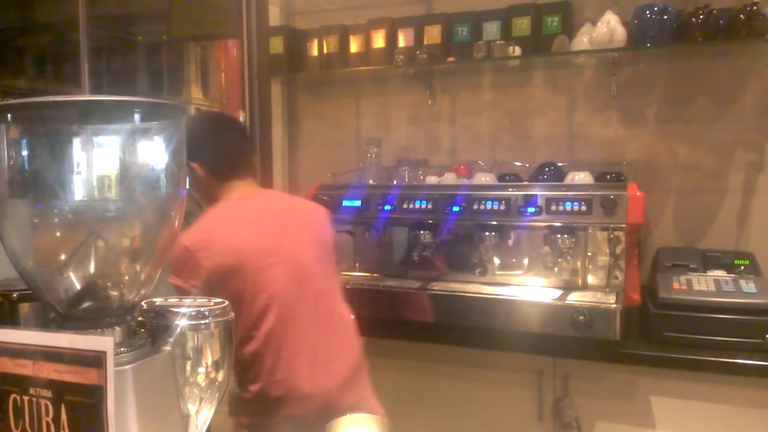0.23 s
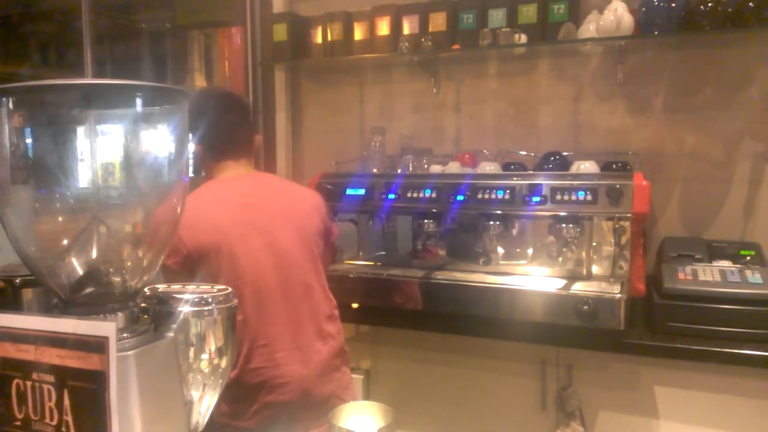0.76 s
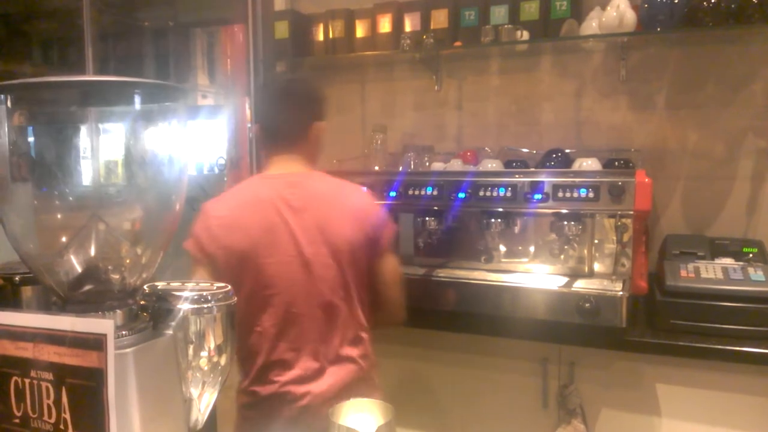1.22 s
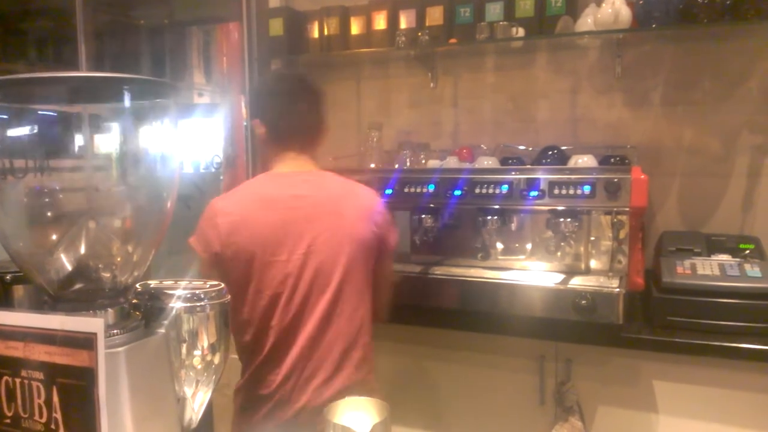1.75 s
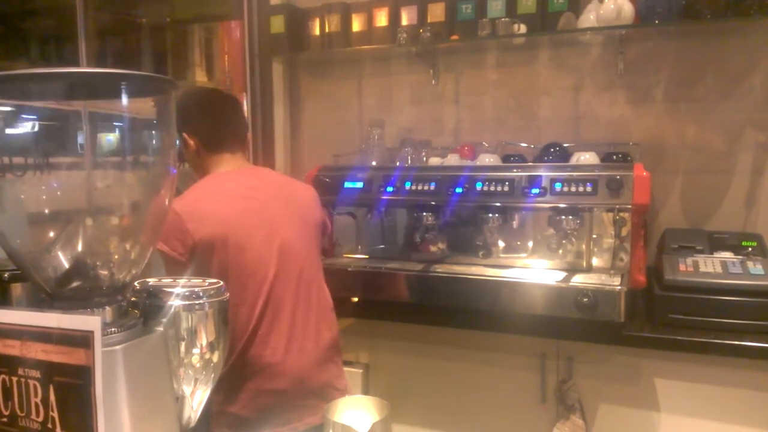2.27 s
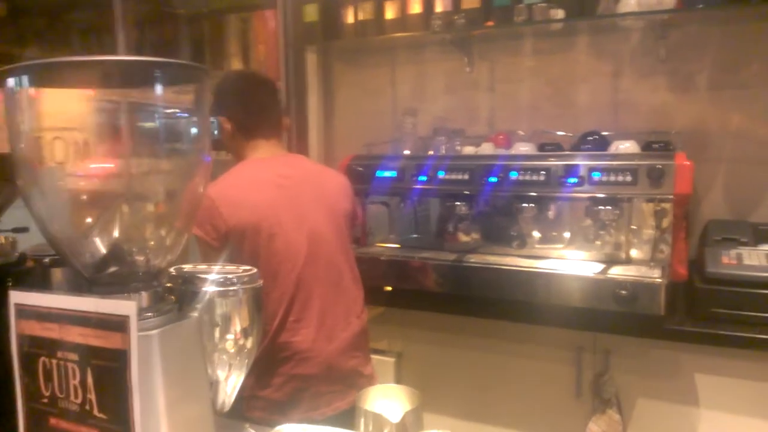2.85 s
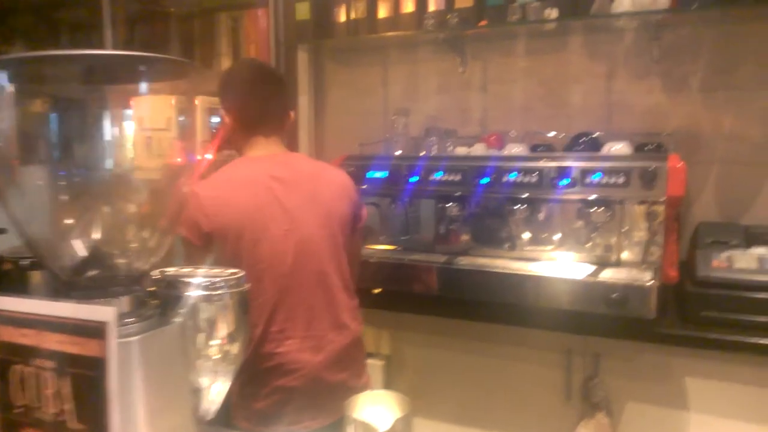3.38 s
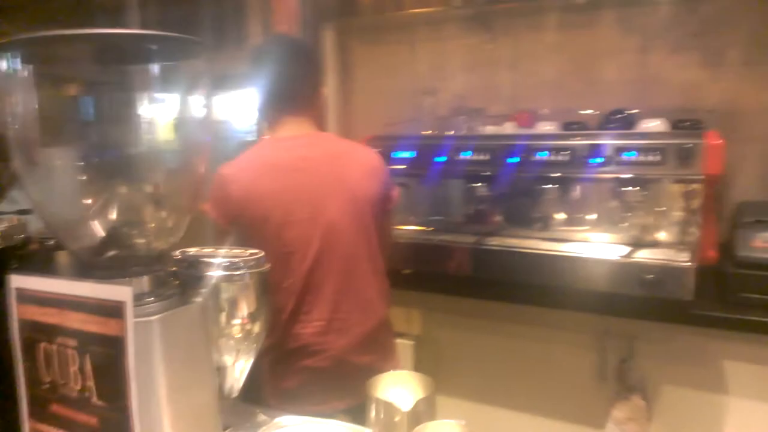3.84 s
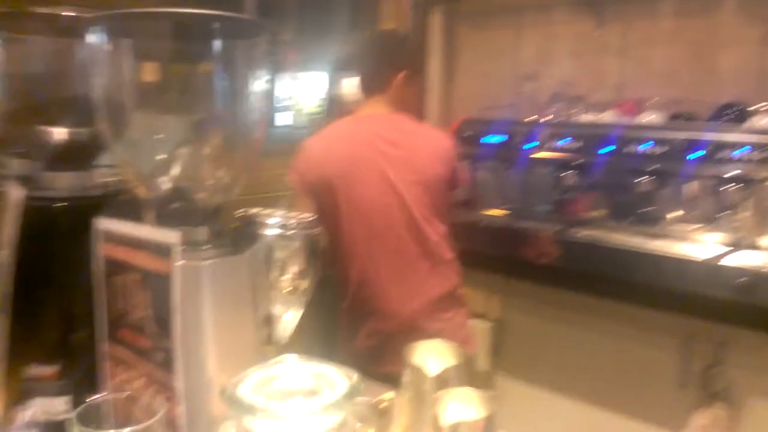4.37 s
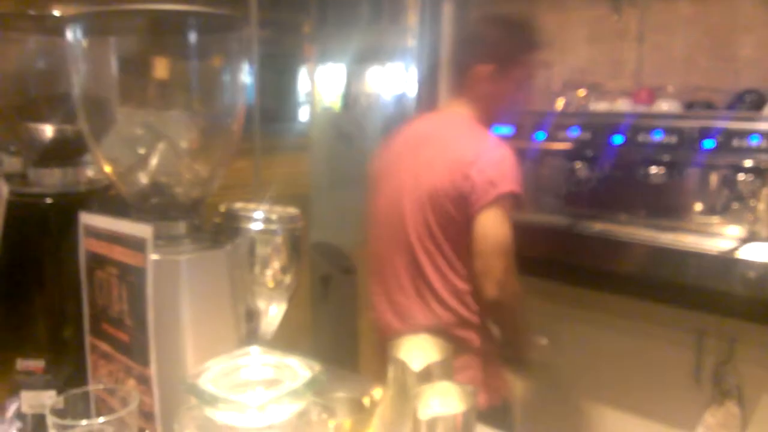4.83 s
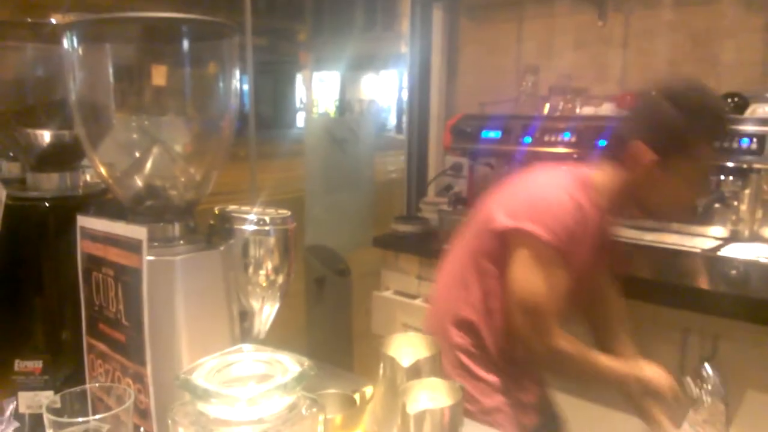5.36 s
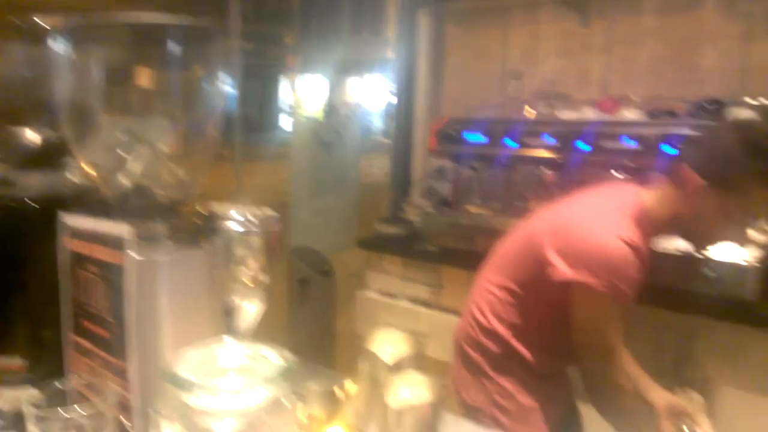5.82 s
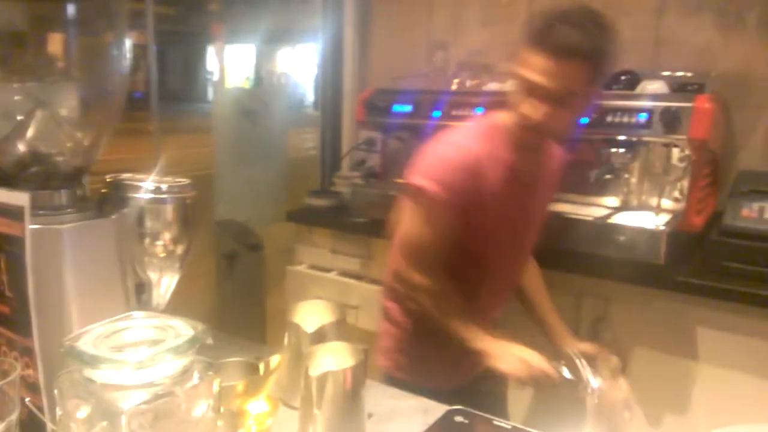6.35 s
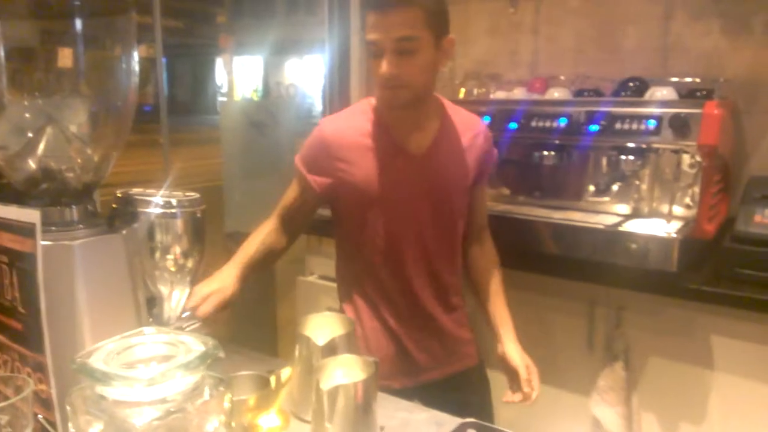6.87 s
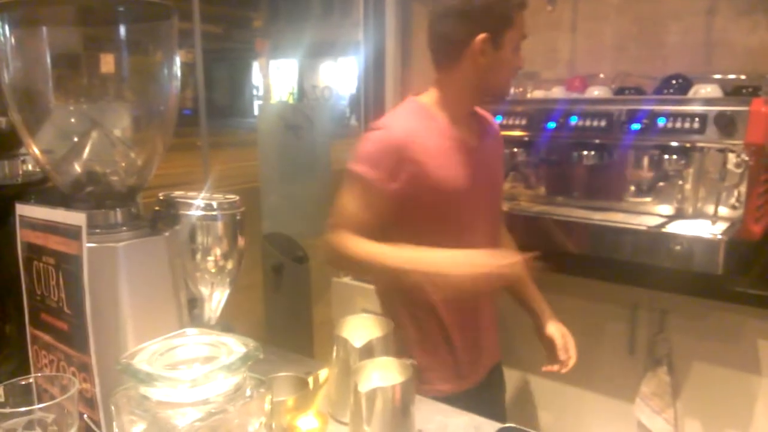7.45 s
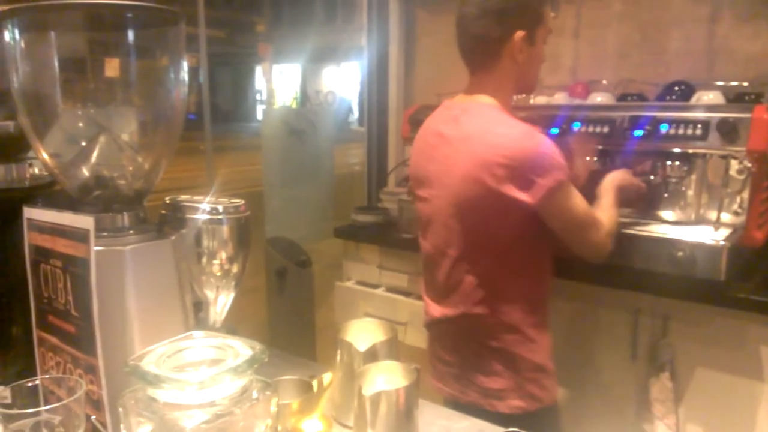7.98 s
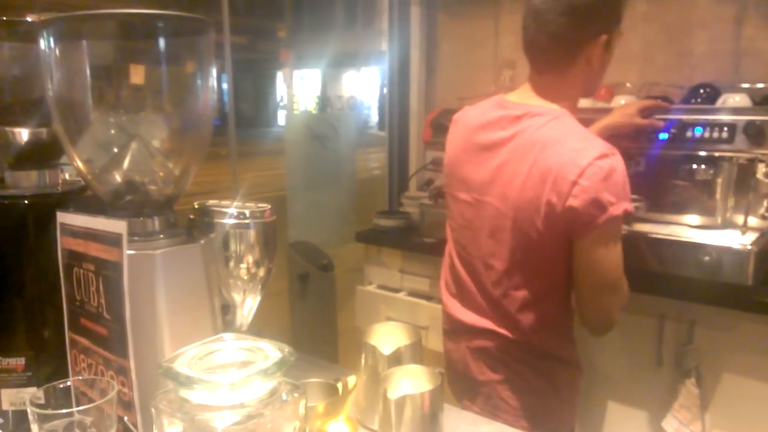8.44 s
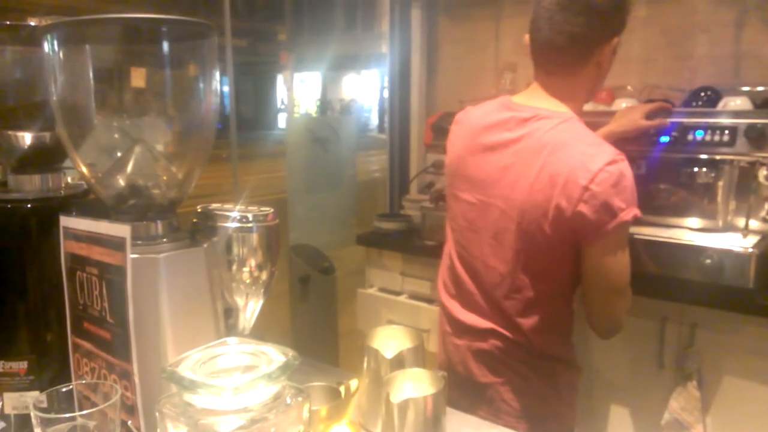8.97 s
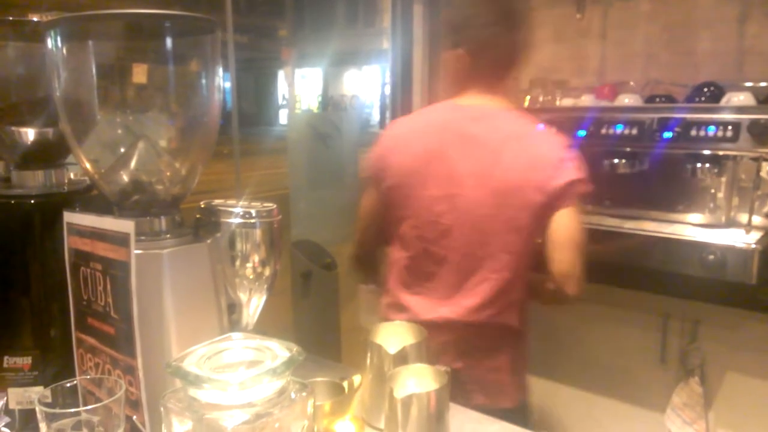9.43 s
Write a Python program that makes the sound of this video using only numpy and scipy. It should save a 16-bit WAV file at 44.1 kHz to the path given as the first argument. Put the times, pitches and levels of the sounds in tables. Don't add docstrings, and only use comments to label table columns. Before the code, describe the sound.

Echoing coffee bar heard through a small microphone a few metres off: three sharp metal bangs, a faint distant pump and rustling, then five harder bangs, the last ringing on. Near ticks and a single sharp steel tap come next. After soft cloth movement a lid clunks down, then comes a short gritty twist, valve clack, faint spray with humming pump and thin whistle, and a closing clack. Fridge hum and airy rumble continue.

```python
import sys
import numpy as np
from scipy import signal
from scipy.fft import rfft, irfft, next_fast_len
from scipy.io import wavfile
from scipy.ndimage import uniform_filter1d

SR = 44100
rng = np.random.default_rng(int(sys.argv[2]) if len(sys.argv) > 2 else 0)


def transcribe(u):
    v = np.clip(np.atleast_2d(u).T, -1, 1)
    q = np.round(v * 32767).astype(np.int16)
    wavfile.write(sys.argv[1], SR, q)


def ratio_of_db(decibels):
    return 10 ** (np.asarray(decibels, float) / 20)


N = 427769
HALL_SPAN = 2 ** 16

# t/s, peak level/dB, thump level re peak/dB, brightness/(dB/octave), favoured f of the spot struck/Hz
FIRST_KNOCKS = [
    (0.250, -2.5, -17.5, -1.5, 5300),
    (0.418, -5, -16.5, -1, 2050),
    (0.582, -5, -14.5, -0.5, 2050),
]
SECOND_KNOCKS = [
    (2.177, -2, -14, -1.3, 4400),
    (2.346, -7.5, -9.5, -0.86, 5300),
    (2.513, -1, -15, -0.088, 4370),
    (2.702, -3, -10.5, -0.15, 1900),
    (2.907, -5.5, -8, 0.81, 4550),
]
RIM_TAP = [
    (4.277, -6.5, -18.5, 0.02, 5250),
]
LID_BOUNCES = [
    (7.070, -27, -0.5, -7.5, 350),
    (7.075, -27.5, -19, 3, 5200),
    (7.089, -41, -10.5, 4, 5100),
    (7.106, -30.5, -0.5, -14, 340),
    (7.147, -35, 2.1, 2.1, 5200),
    (7.130, -30, 1.1, 3, 5100),
    (7.184, -26, -32, 1.5, 1060),
    (7.211, -31.5, -25, -2.5, 1050),
]
VALVE_OPENS = [
    (8.267, -35, -30, 0.1, 2200),
    (8.282, -19, -18, 0.1, 6160),
    (8.294, -29, -30, 0.1, 1650),
]
VALVE_SHUTS = [
    (8.945, -27, -22, 0.1, 2420),
]
# f/Hz, level/(dB/Hz)
KNOCK_COLOUR = [(70, -33), (360, -13.5), (540, -19), (800, -16), (1400, -12), (1600, -3.5), (2050, -2),
                (2700, -5), (3500, -13), (4300, -4), (5400, -6), (8000, -24), (9100, -23), (16000, -39)]
TAP_COLOUR = [(150, -48), (300, -18), (500, -16), (800, -9.5), (1200, -15.5), (1600, -3.5), (2100, -0.5),
              (2800, -2), (3400, -16), (4300, -5), (5300, -5.5), (8000, -22), (9200, -22), (16000, -43)]
LID_COLOUR = [(88, -24), (150, -6.5), (222, -1), (280, -9.5), (354, -6), (759, -15.5), (1040, -14.5),
              (1420, -15.5), (2360, -17.5), (2810, -28.5), (5150, -25.5), (7320, -41), (16000, -68)]
OPENING_COLOUR = [(240, -44), (400, -25.5), (753, -17), (826, -18), (1070, -20), (1580, -10), (2020, -12.5),
                  (2320, -14), (3470, -18), (5780, -4.5), (6540, -23.5), (9470, -12.5), (16000, -34)]
SHUTTING_COLOUR = [(300, -38), (600, -23), (1000, -15), (1600, -6.5), (2400, -6.5), (3300, -3),
                   (5700, -8.5), (8270, -22.5), (9200, -19), (16000, -35)]
# f/Hz, level/dB, t60/s
HANDLE_MODES = [(2046, -1, .2), (2390, -8, .25), (2560, -8, .15), (4195, -7, .85), (4214, -7.5, .8),
                (5500, -1, .05), (6500, -11, .1), (7450, -16, .12), (8900, -15, .1), (9300, -15, .15),
                (14000, -30, .1)]
BASKET_MODES = [(1810, 2, 0.18), (2120, -10, 0.14), (2480, 4, 0.15), (4220, -2.5, .9), (4280, -15, .5),
                (4320, -4, .35), (4600, -6, 0.98), (5300, -8, .06), (6070, -5, .15), (6600, -9, .15),
                (7250, -12, .18), (9100, -15, .15), (10900, -23, .13), (14000, -26, .12)]
RIM_MODES = [(1852, -6, .08), (2358, -5, .08), (2632, -4, .08), (4300, 0, .08), (4660, -2, .12),
             (5100, -2, .12), (6761, -13, .3), (7330, -14, .12), (9157, -22, .4)]
LID_MODES = [(361, -3, 0.094), (990, -18, .08), (1900, -3, 0.082), (2400, -14, .09), (4700, -18, .07),
             (8450, -26, 0.23)]
ARMATURE_MODES = [(1610, -10, .15), (4780, -10, .15), (5114, -9, .2), (5705, 0, .35), (5780, -5, .3),
                  (5870, -4, .4), (8802, -12, .15), (9400, -13, .2), (9700, -14, .15)]
PLUNGER_MODES = [(759, -16, .45), (2277, -2, .06), (2700, 0, .05), (4527, -5, .1), (5717, -6, .1),
                 (9300, -13, .12), (9370, -15, .2)]
# f/Hz, t60/s
HALL_T60 = [(100, 0.55), (300, 0.67), (700, 0.85), (1800, 0.94), (4800, 1), (8000, .65), (13000, 0.46)]
# level/dB, rise/s, hold/s, fall/(dB/s)
TWIST_SWELL = (-49.5, 0.04, .08, 140)
# f/Hz, width/Hz, level/dB
SEAT_MODES = [(827, 60, 10), (1500, 330, 8.5), (2200, 450, 11), (4550, 360, 13), (5300, 450, -25),
              (7200, 2000, -21.5), (9000, 300, -29)]
# level/dB, rise/s, hold/s, fall/(dB/s)
PUMP_SWELL = (-60.5, 0.4, 0.5, 502)
WHISTLE_SWELL = (-61, .3, .12, 800)
FAR_PUMP_SWELL = (-58, .06, .15, 300)
# t/s, peak level/dB, length/s, f/Hz
TICKS = [(3.5132, -23, 0.00041, 6200), (3.516, -30.5, .002, 5600), (3.520, -38, .004, 5600),
         (3.525, -34, .0015, 5400), (3.519, -53.5, 0.025, 7400), (3.521, -64, .05, 8500),
         (3.737, -52, 0.026, 5200), (5.338, -49, .002, 5200), (7.897, -47, .003, 4800),
         (4.185, -48.5, 0.089, 1460)]
# t of top/s, level/dB, rise/s, hold/s
RUSTLES = [(1.15, -76, .2, 0.13), (1.39, -78, .1, .02), (1.684, -76, .1, .01), (1.83, -85, .05, .15),
           (4.08, -92, .03, .01), (4.798, -70, .15, .01), (4.93, -67.5, 0.11, 0.016),
           (5.332, -69, .07, .02), (5.93, -84, .3, .05), (6.188, -72.5, .1, .01),
           (6.368, -74, 0.066, 0.066), (6.55, -81.5, .15, 0.073), (6.694, -74, .04, .005),
           (6.95, -86, .04, .005), (7.42, -85, .05, .06), (7.68, -77, .03, .1), (7.9, -70.5, .2, 0.099),
           (8.2, -82, .1, .05), (9.3, -90, .1, .02), (9.6, -71.5, .08, .05)]
# f/Hz, level/(dB/Hz)
RUSTLE_COLOUR = [(2500, -13), (4500, 3.5), (6000, 3), (7500, -9.5), (10000, -19), (15500, -27)]
AIR_COLOUR = [(150, -19), (250, -1), (400, -3), (620, -4.5), (900, -4.5), (1200, -6.5), (1750, -3),
              (2440, -9), (3400, -16), (4500, -10.5), (5800, -15.5), (6800, -28.5), (8000, -60),
              (16000, -52)]
RUMBLE_COLOUR = [(8.8, -44), (15, 16.5), (54, 5), (70, -14), (97, -1.5), (123, -3), (204, -10), (244, -1),
                 (400, -43), (520, -45), (880, -120)]
# f/Hz, width/Hz, level/dB
HUM_TONES = [(96.8, 7.1, -61), (150, 17.5, -60), (177.2, 4.5, -61.5), (234.6, 16, -67.5), (909, 7, -67),
             (1685, 14, -69.5)]
# t/s, level/dB
BUSTLE = [(0, -45), (1.1, -43), (2.1, -43.5), (3.6, -48.5), (5.0, -48.5), (7.0, -55.5), (8.2, -48.5),
          (9.7, -54)]


def knocks():
    box = hall(direct_db=-9.5, direct_s=0.01, first_echo_s=0.0063, build_s=0.0014, early_db=2.5, early_s=0.034)
    first = blows(FIRST_KNOCKS, KNOCK_COLOUR, HANDLE_MODES, box, ring_db=-16, near_db=30.5, thump_hz=120,
                  thump_t60=.2, lift_db=4, lead_s=.006, grip_db_per_s=170, thump_rise_s=.018,
                  overtone=.6, overtone_ratio=1.4, slap_db=-10.5, thump_wet_db=-17)
    second = blows(SECOND_KNOCKS, KNOCK_COLOUR, BASKET_MODES, box, ring_db=-17, near_db=29, thump_hz=118,
                   thump_t60=.19, lift_db=4, lead_s=.006, grip_db_per_s=5, thump_climb=.11, thump_rise_s=.016,
                   overtone=.55, overtone_ratio=1.33, slap_db=-10.5, thump_wet_db=-13)
    return first + second


def rim_tap():
    ledge = hall(direct_db=-5, direct_s=.011, first_echo_s=0.0039, build_s=0.002, early_db=2.5, early_s=0.014)
    return blows(RIM_TAP, TAP_COLOUR, RIM_MODES, ledge, ring_db=-10, near_db=30.5, thump_hz=129,
                 thump_t60=.03, lift_db=3, lead_s=.005)


def lid_drop():
    bar = hall(direct_db=17, direct_s=0.0029, first_echo_s=0.0023, build_s=0.0028, early_db=5.5, early_s=0.026)
    return blows(LID_BOUNCES, LID_COLOUR, LID_MODES, bar, ring_db=-18, near_db=38.5, thump_hz=350,
                 thump_t60=.052, lift_db=4, grip_db_per_s=500)


def valves():
    group = hall(direct_db=7, direct_s=0.0029, first_echo_s=0.00082, build_s=0.0017, early_db=7, early_s=0.012)
    opening = blows(VALVE_OPENS, OPENING_COLOUR, ARMATURE_MODES, group, ring_db=-10, near_db=32,
                    thump_hz=280, thump_t60=.07, lift_db=6)
    shutting = blows(VALVE_SHUTS, SHUTTING_COLOUR, PLUNGER_MODES, group, ring_db=-10.5, near_db=35,
                     thump_hz=149, thump_t60=.071, lift_db=4)
    return opening + shutting


def twist():
    clicks_per_s = 1500
    size = ratio_of_db(3.0 * np.minimum(rng.exponential(1, N), 4))
    grit = (rng.random(N) < clicks_per_s / SR) * size * rng.choice([-1, 1], N)
    grit = grit + 1.6 * rng.standard_normal(N)
    seat = sum(ratio_of_db(db) * resonance(resonance(grit, hz, 3 * width), hz, width) for hz, width, db in SEAT_MODES)
    return swell(7.89, *TWIST_SWELL) * rms_one(seat)


def pumps():
    white = rng.standard_normal(N)
    pump_hz, whistle_hz, far_pump_hz = 480, 5100, 510
    pump = np.sqrt(2) * np.sin(2 * np.pi * pump_hz * np.arange(N) / SR) * ratio_of_db(2.5 * drift(11))
    whistle = resonance(white, whistle_hz, 30)
    far_pump = resonance(white, far_pump_hz, 4)
    out = swell(8.57, *PUMP_SWELL) * pump
    out += swell(8.8, *WHISTLE_SWELL) * whistle
    return out + swell(1.17, *FAR_PUMP_SWELL) * far_pump


def rustle_and_flush():
    fall_db_per_s, flush_s, flush_end_s, sag_db_per_s = 122, 8.4, 8.94, 26
    flush_db, spray_db, spray_hz = -61.5, -63, 7500
    gain = sum(swell(*move, fall_db_per_s) for move in RUSTLES)
    flow = swell(flush_s, 0, .15, 0, sag_db_per_s) * swell(0, 0, 1, flush_end_s, fall_db_per_s)
    hiss = ratio_of_db(16.0) * patchy_noise(RUSTLE_COLOUR, patchy_db=2.5, rate=14)
    spray = resonance(rng.standard_normal(N), spray_hz, 6000)
    return (gain + ratio_of_db(flush_db) * flow) * hiss + ratio_of_db(spray_db) * flow * spray


def ticks():
    out, t = np.zeros(N), np.arange(4096) / SR
    bursts = rng.standard_normal((len(TICKS), t.size))
    for (s, db, length_s, hz), burst in zip(TICKS, bursts):
        burst = resonance(resonance(burst, hz, .5 * hz), hz, .5 * hz)
        at = round(s * SR)
        out[at:at + t.size] += ratio_of_db(db) * burst * np.exp(-(t / length_s) ** 2)
    return out


def fridge_hum():
    white = rng.standard_normal(N)
    return sum(ratio_of_db(db) * resonance(white, hz, width) for hz, width, db in HUM_TONES)


def air_and_rumble():
    rumble_db, = in_time(BUSTLE)
    air_db = -51.5 + 0.43 * (rumble_db - rumble_db.mean())
    air = ratio_of_db(air_db) * patchy_noise(AIR_COLOUR, patchy_db=.4, rate=6)
    return air + ratio_of_db(rumble_db) * patchy_noise(RUMBLE_COLOUR, patchy_db=0.0, rate=7.4)


def blows(events, colour, modes, room, ring_db, near_db, thump_hz, thump_t60, lift_db, lead_s=0,
          grip_db_per_s=0, thump_climb=0, thump_rise_s=0.00043, overtone=.44, overtone_ratio=1.68,
          slap_db=-60, thump_wet_db=0):
    size = 2 * HALL_SPAN
    out, t = np.zeros(N + size), np.arange(HALL_SPAN) / SR
    hz = np.arange(HALL_SPAN + 1) * SR / size + 1e-9
    mode_hz, mode_db, mode_t60 = np.array(modes).T[:, :, None]
    mode_shapes = ratio_of_db(mode_db - 60 * t / mode_t60) * np.sin(2 * np.pi * mode_hz * t)
    lucks = rng.standard_normal((len(events), len(modes) + 1))
    chatters = rng.standard_normal((len(events), 2048)) * np.exp(-t[:2048] / .004)
    soft = 1 - np.exp(-t / 0.0018)
    slap = 1 + ratio_of_db(slap_db) * np.exp(-2j * np.pi * hz * .113)
    thump_path = ratio_of_db(thump_wet_db) * room + ratio_of_db(near_db) * slap
    for k, ((s, db, thump_db, bright_db, spot_hz), luck, chatter) in enumerate(zip(events, lucks, chatters)):
        tilt_db = bright_db * np.clip(np.log2(hz / 3000), -2, 2)
        crack = 1 + .4 * rfft(chatter / np.sqrt(np.sum(chatter ** 2)), size)
        crack = crack * causal(at_hz(colour, hz) + tilt_db)
        crack /= np.sqrt(np.mean(np.abs(crack) ** 2))

        gripped = k < len(events) - 1
        ring = ratio_of_db(1.53 * luck[1:]) @ mode_shapes * ratio_of_db(-grip_db_per_s * t * gripped)
        body = rfft(ratio_of_db(ring_db) * soft * ring / np.sqrt(np.sum(ring ** 2)), size)

        turn = 2 * np.pi * thump_hz * (1 + 0.053 * luck[0] + thump_climb * k) * t
        thump = np.sin(turn) + overtone * np.sin(overtone_ratio * turn) + 0.32 * np.sin(0.72 * turn)
        thump *= ratio_of_db(-60 * t / thump_t60) * (1 - np.exp(-(t / thump_rise_s) ** 2))
        low = rfft(ratio_of_db(thump_db) * soft * thump / np.sqrt(np.sum(thump ** 2)), size)

        spot = causal(lift_db * np.exp(-(np.log2(hz / spot_hz) / 0.16) ** 2))
        heard = irfft((crack * room + body * (room + ratio_of_db(near_db)) + low * thump_path) * spot)
        at = round((s - lead_s) * SR)
        out[at:at + size] += ratio_of_db(db - 10) * heard
    return out[:N]


def hall(direct_db, direct_s, first_echo_s, build_s, early_db, early_s):
    t, hz = np.arange(HALL_SPAN) / SR, np.arange(HALL_SPAN // 2 + 1) * SR / HALL_SPAN
    white, tail = rfft(rng.standard_normal(HALL_SPAN)), 0
    for centre in np.arange(5, 15, .5):
        share = np.cos(np.pi * np.clip(np.log2(hz + 1e-9) - centre, -.5, .5)) ** 2
        tail = tail + irfft(white * share) * ratio_of_db(-60 * t / at_hz(HALL_T60, 2 ** centre))
    build = 1 - np.exp(-np.maximum(t - first_echo_s, 0) / build_s)
    echoes = build * ratio_of_db(early_db * np.exp(-t / early_s))
    direct = ratio_of_db(direct_db) * np.exp(-t / direct_s)
    return rfft(tail * (echoes + direct), 2 * HALL_SPAN)


def swell(s, db, rise_s, hold_s, fall_db_per_s):
    t = np.arange(N) / SR - s
    below_db = np.maximum(-30 * t / rise_s, fall_db_per_s * (t - hold_s))
    return ratio_of_db(db - np.maximum(below_db, 0))


def patchy_noise(colour, patchy_db, rate):
    size = next_fast_len(N)
    hz = np.arange(size // 2 + 1) * SR / size
    white = rfft(rng.standard_normal(size)) * ratio_of_db(at_hz(colour, hz))
    octave, out = np.log2(hz + 1e-9), 0
    for centre in range(3, 15):
        share = np.cos(np.pi / 2 * np.clip(octave - centre, -1, 1)) ** 2
        out = out + irfft(white * share, size)[:N] * ratio_of_db(patchy_db * drift(rate))
    return rms_one(out)


def resonance(x, hz, width_hz):
    r = np.exp(-np.pi * width_hz / SR)
    return rms_one(signal.lfilter([1, 0, -1], [1, -2 * r * np.cos(2 * np.pi * hz / SR), r * r], x))


def drift(rate):
    r = np.exp(-80 * np.pi * rate / SR)
    white = rng.standard_normal(N // 40 + 2002)
    slow = signal.lfilter([1], [1, -2 * r, r * r], white)[2000:]
    return np.interp(np.arange(N) / 40, np.arange(len(slow)), rms_one(slow))


def causal(db):
    fold = irfft(db * np.log(10) / 20)
    half = len(fold) // 2
    fold[1:half] *= 2
    fold[half + 1:] = 0
    return np.exp(rfft(fold))


def at_hz(points, hz):
    point_hz, value = np.array(points).T
    return np.interp(np.log(hz + 1e-9), np.log(point_hz), value)


def in_time(rows):
    s, *columns = np.transpose(rows)
    return [np.interp(np.arange(N) / SR, s, c) for c in columns]


def rms_one(x):
    return x / np.sqrt(np.mean(x ** 2) + 1e-20)


def scene():
    struck = knocks() + rim_tap() + lid_drop() + valves()
    moved = twist() + pumps() + rustle_and_flush() + ticks()
    return np.tile(struck + moved + fridge_hum() + air_and_rumble(), (2, 1))


def roll_off(x):
    return signal.sosfilt(signal.butter(12, 16820, fs=SR, output="sos"), x)


def record(dry):
    threshold_db, release_db_per_s, cutoff_hz = -13.5, 90, 16250
    level_db = 10 * np.log10(uniform_filter1d(dry[0] ** 2, size=220) + 1e-12)
    release_db = release_db_per_s * np.arange(N) / SR
    held_db = np.maximum.accumulate(level_db + release_db) - release_db
    cut_db = signal.lfilter([.02], [1, -.98], -.7 * np.maximum(held_db - threshold_db, 0))
    rounded = 0.9 * np.tanh(dry * ratio_of_db(cut_db) / 0.81)
    low_pass = signal.cheby2(14, 60, cutoff_hz, fs=SR, output="sos")
    mix = signal.sosfilt(low_pass, rounded)
    return roll_off(mix)


dry = scene()
out = record(dry)
transcribe(out)
```